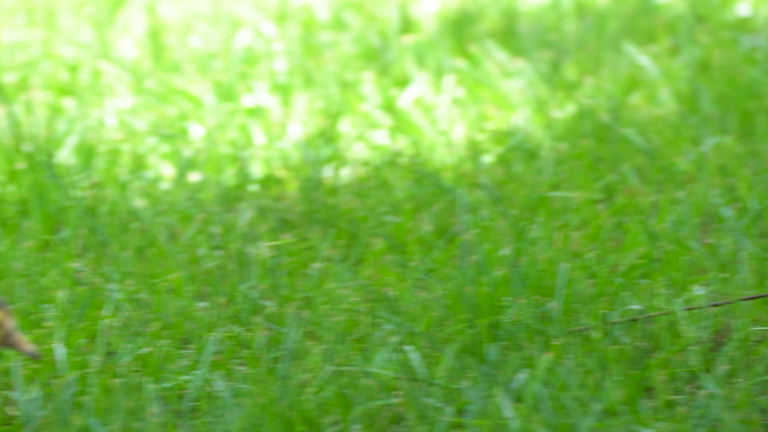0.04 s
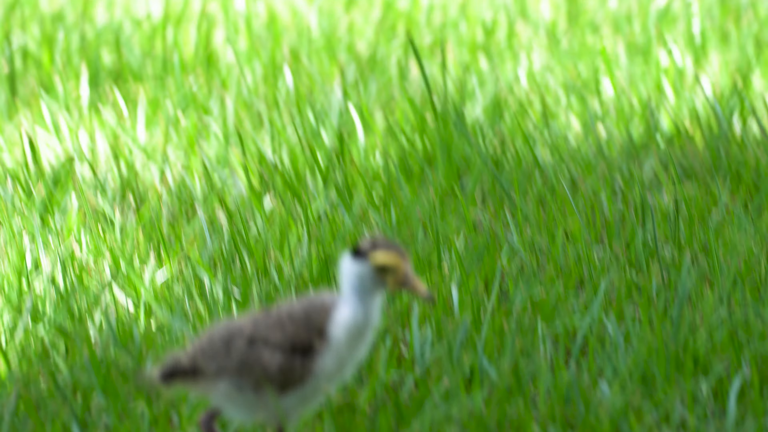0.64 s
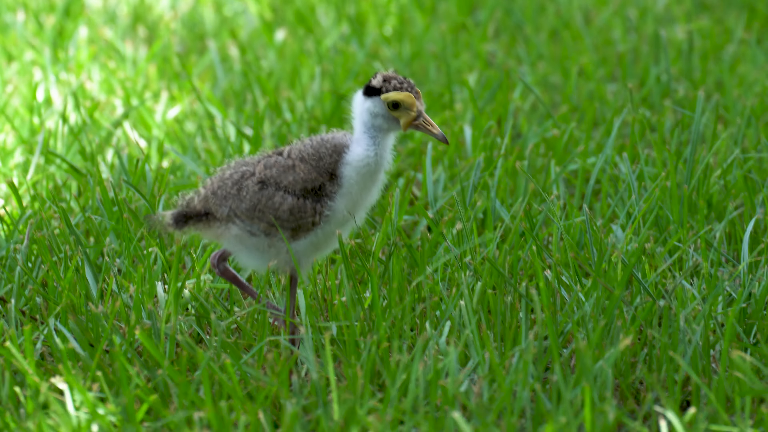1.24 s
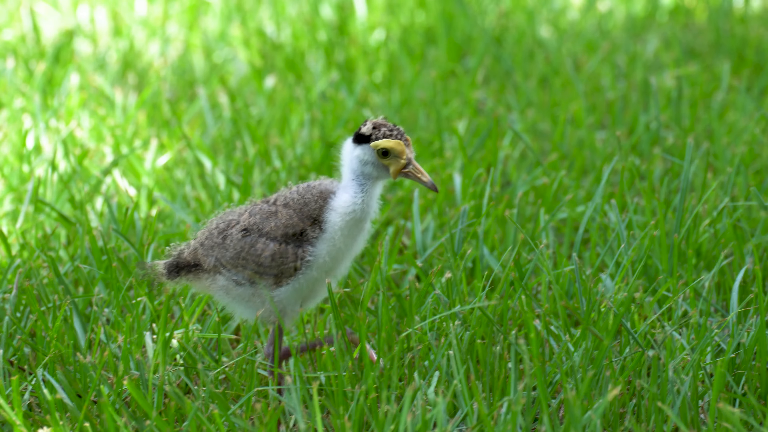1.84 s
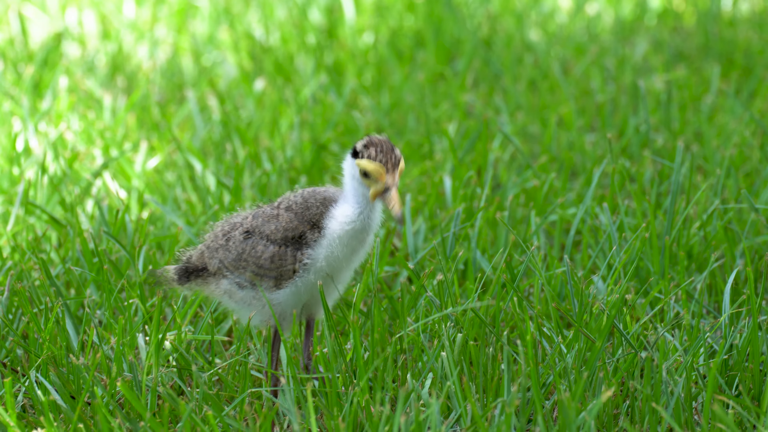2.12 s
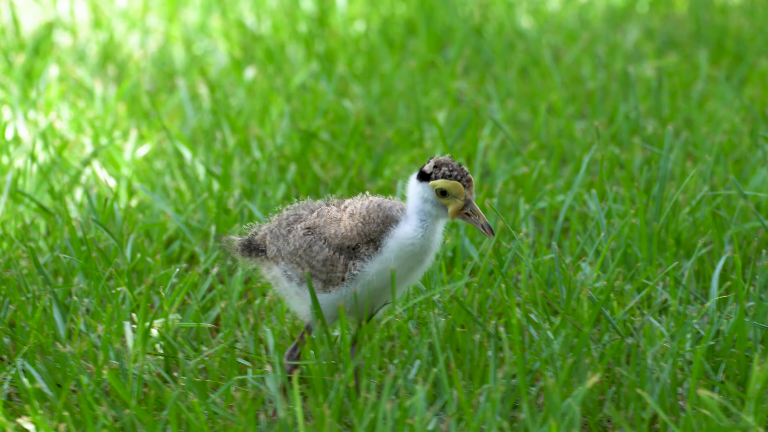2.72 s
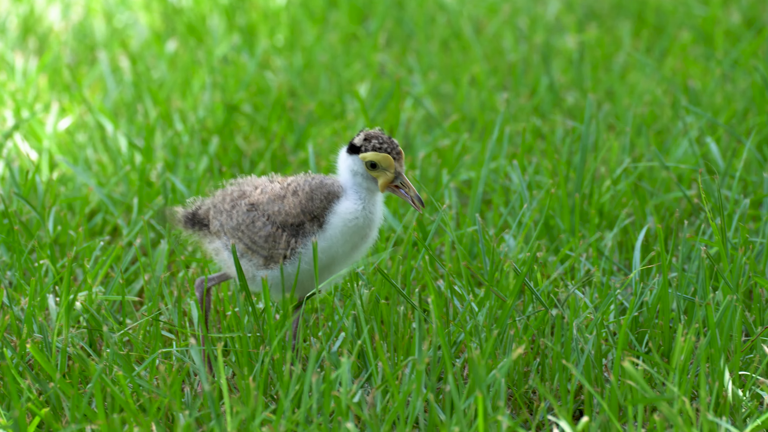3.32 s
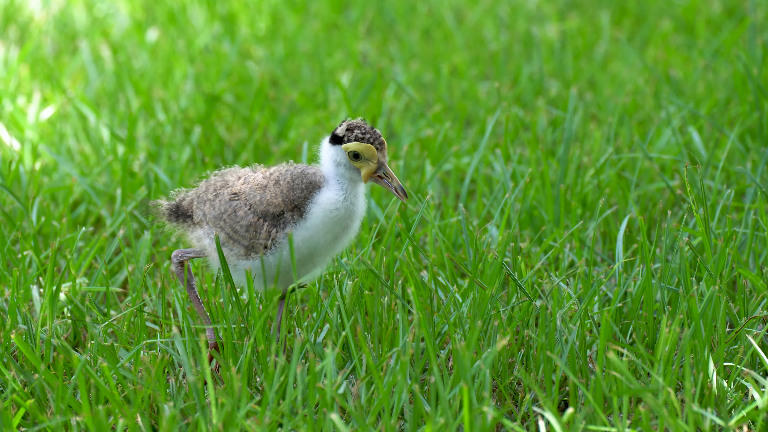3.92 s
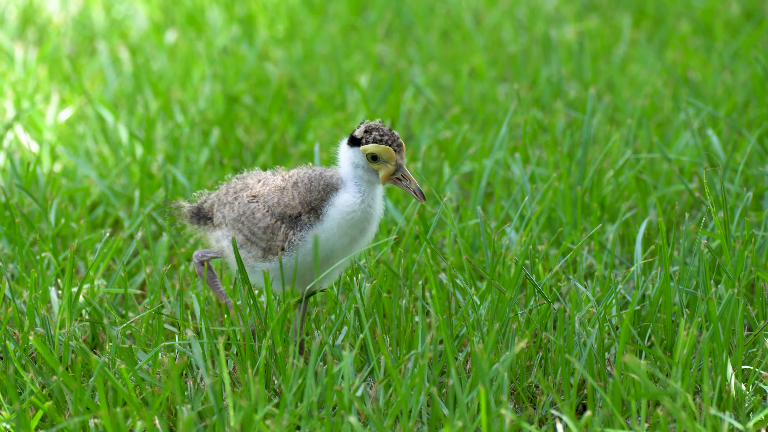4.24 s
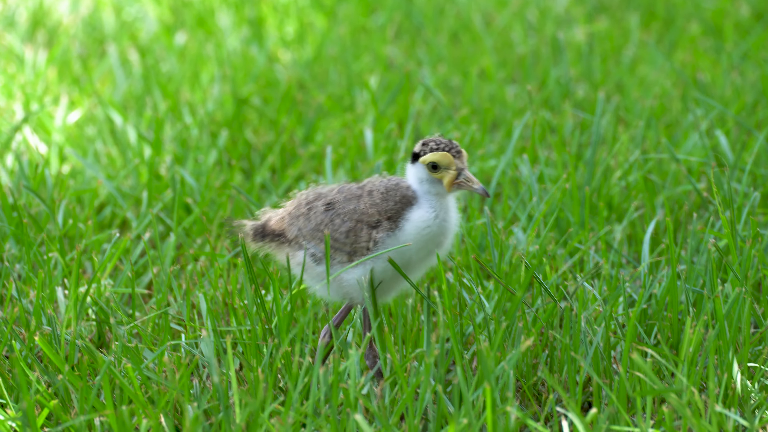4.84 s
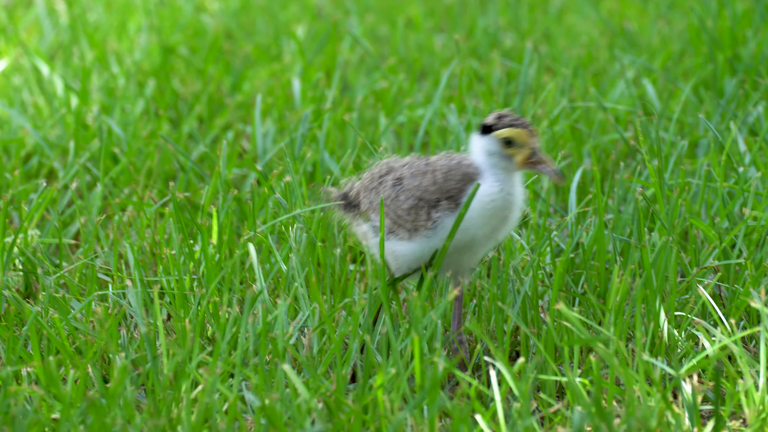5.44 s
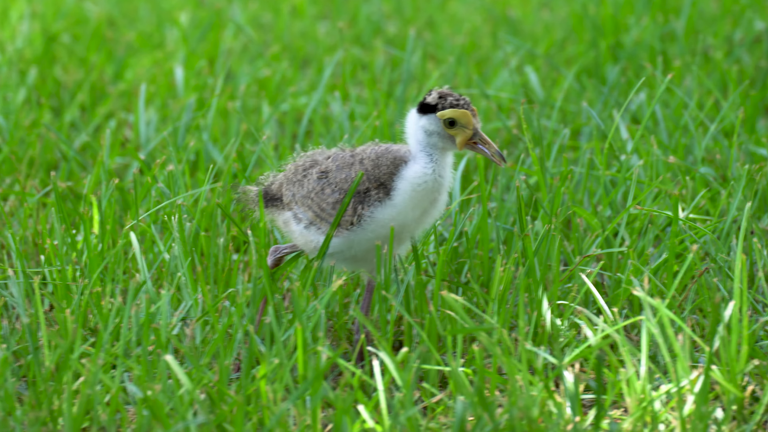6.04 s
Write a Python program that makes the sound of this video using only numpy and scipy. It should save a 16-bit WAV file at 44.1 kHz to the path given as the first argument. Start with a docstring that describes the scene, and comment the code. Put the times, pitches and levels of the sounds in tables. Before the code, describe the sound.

On a summer lawn, a soft, steady hiss of leaves lies under a shrill chorus of distant insects. Nearer insects rasp about three times a second, growing louder, while faint, short bird chirps come from the left. About halfway through, a young bird close to the microphone gives one brief, harsh screech. The insects keep pulsing and fade near the end. There is almost no bass.

```python
"""Shrill rasping calls on a summer lawn: a far chorus blurs into one wavering band, while nearer rasps swell
and fade about three times a second. Both set resonances ringing. Leaves and far surroundings hiss steadily, and
short whistled chirps come from further off. About three seconds in, a young bird forces air through its throat
in one harsh, toneless screech. There is almost no bass."""
import sys
import numpy as np
from scipy import signal
from scipy.fft import rfft, irfft, next_fast_len
from scipy.io import wavfile

SR = 44100
rng = np.random.default_rng(int(sys.argv[2]) if len(sys.argv) > 2 else 0)


def inscribe(sig):
    """Save sig as 16-bit PCM at rate SR to the path in sys.argv[1].

    A 1-D sig is mono; a 2-D sig holds one channel per row.
    Samples are clipped to [-1, 1] before scaling.
    """
    pcm = np.round(np.clip(np.atleast_2d(sig).T, -1, 1) * 32767)
    wavfile.write(sys.argv[1], SR, pcm.astype(np.int16))


N = 272097
TIME = np.arange(N) / SR
BINS_HZ = np.maximum(np.arange(N // 2 + 1) * SR / N, 1)


def from_db(db):
    """Turn decibels into a number to multiply by."""
    return 10 ** (np.asarray(db) / 20)


def rms_one(x):
    """Scale a signal so its average strength (rms) is 1."""
    return x / np.sqrt(np.mean(np.abs(x) ** 2) + 1e-20)


def over_hz(points):
    """Join a table's points into a curve over all frequencies."""
    hz, value = np.transpose(points)
    return np.interp(np.log(BINS_HZ), np.log(hz), value)


def drift(rate, size=N):
    """Wander at random, by about 1, up to about `rate` times a second."""
    padded = next_fast_len(size, real=True)
    hz = np.fft.rfftfreq(padded, 1 / SR)
    spectrum = rfft(rng.standard_normal(padded)) / (1 + (hz / rate) ** 2)
    return rms_one(irfft(spectrum, padded)[:size])


def pan(balance_db):
    """Left and right gains; a positive balance leans left."""
    return from_db(np.array([[.5], [-.5]]) * balance_db)


def left_and_right(mid, side, likeness):
    """Mix two noises for two ears: likeness 0 is unrelated, 1 or more is identical."""
    alike = np.clip(likeness, -1, 1)
    return np.sqrt(1 + alike) * mid + np.sqrt(1 - alike) * side * [[1], [-1]]


def stereo_noise(likeness, colour_db=0):
    """Noise with a chosen tone colour, partly shared by both ears."""
    mid, side = rfft(rng.standard_normal((2, N)))
    return rms_one(irfft(left_and_right(mid, side, likeness) * from_db(colour_db), N))


def resonate(drive, centre_hz, width_hz):
    """A resonance: only sound near a centre pitch, which may move, rings through."""
    turn = np.exp(2j * np.pi * np.cumsum(centre_hz) / SR)
    smoothing = signal.butter(2, width_hz / 2, fs=SR, output="sos")
    return rms_one((signal.sosfilt(smoothing, drive / turn) * turn).real)


def envelope_db(full_s, hold_s, rise_db_per_s, fall_db_per_s):
    """Rise to 0 dB at `full_s`, hold, then fade."""
    before_s = np.maximum(full_s - TIME, 0)
    after_s = np.maximum(TIME - full_s - hold_s, 0)
    return -rise_db_per_s * before_s - fall_db_per_s * after_s


# Tone colour of the hiss: (frequency [Hz], relative level [dB])
HISS_COLOUR = [(30, -61), (170, -52), (330, -41.5), (480, -30), (730, -8.5), (1100, 0.5), (2000, 4.5),
               (3000, 5.5), (4400, 10), (6000, 6), (8500, 1.5), (10000, 3), (12500, -7), (15500, -23)]
# How alike the hiss is in both ears: (frequency [Hz], likeness [1 or more = identical])
HISS_LIKENESS = [(300, 2), (700, 0.94), (1500, 0.54), (3000, .5), (6000, 0.16), (12000, 0.16)]
# Which way the hiss leans: (frequency [Hz], left minus right [dB])
HISS_BALANCE = [(500, -.5), (1500, 0.43), (5000, .7), (12000, -.8)]
def hiss(start_db=-33.5, rise_db_per_s=0.2831, flutter_db=0.68):
    """Leaves and far surroundings: a smooth, slowly growing hiss, wider in the treble."""
    level_db = start_db + rise_db_per_s * TIME + flutter_db * drift(20)
    colour_db = over_hz(HISS_COLOUR) + np.array([[.5], [-.5]]) * over_hz(HISS_BALANCE)
    return from_db(level_db) * stereo_noise(over_hz(HISS_LIKENESS), colour_db)


def rasp(size, depth_db, rate_hz, likeness):
    """A rasping drive: noise in quick, uneven bursts."""
    mid, side = rng.standard_normal((2, size))
    return left_and_right(mid, side, likeness) * from_db(depth_db * drift(rate_hz, size))


# Where the far chorus rings: (pitch [Hz], width [Hz], relative level [dB])
FAR_RESONANCES = [(3340, 490, -11), (4424, 990, 1.5), (6370, 1830, -1.5)]
def far_chorus(held_db=-34, flutter_db=1.5, waver=0.017):
    """Many distant callers blur into one shrill band that builds, holds and fades."""
    level_db = held_db + envelope_db(full_s=2.71, hold_s=2.1, rise_db_per_s=3.5, fall_db_per_s=9)
    rasping = rasp(N, depth_db=0.5, rate_hz=300, likeness=0.39)
    slide = 1 + waver * drift(5.5)
    rings = sum(from_db(db) * resonate(rasping, hz * slide, width_hz)
                for hz, width_hz, db in FAR_RESONANCES)
    return from_db(level_db + flutter_db * drift(6)) * rings


def whistle(centre_hz, wander_hz, flicker_db=2.0):
    """A thin tone that wanders in pitch, flickers, and shifts between the ears."""
    size = len(centre_hz)
    phase = 2 * np.pi * np.cumsum(centre_hz + wander_hz * drift(45, size)) / SR
    apart = drift(60, size) * np.array([[.5], [-.5]])
    return rms_one(np.sin(phase + apart) * from_db(flicker_db * drift(63, size)))


def ring(drive, centre_hz, width_hz, clear):
    """A noisy resonance with a share `clear` of its power in a whistle."""
    noisy = np.sqrt(1 - clear) * resonate(drive, centre_hz, width_hz)
    return noisy + np.sqrt(clear) * whistle(centre_hz, width_hz / 4)


# Each near rasp: (start [s], length [s], pitch [Hz], level [dB], left minus right [dB])
NEAR_SWELLS = [(0.231, 0.23, 4450, -37.5, 1), (0.547, 0.14, 4630, -37.5, 1.5), (0.781, 0.22, 4380, -37, 3),
               (1.0, 0.19, 4470, -35, 3), (1.27, .15, 4650, -33, 3), (1.458, 0.15, 4380, -33.5, 1.5),
               (1.79, .17, 4515, -32, 3), (2.062, .18, 4644, -29.5, 3), (2.325, 0.21, 4550, -29, 2.5),
               (2.57, 0.18, 4470, -29.5, 3), (2.78, .15, 4420, -28.5, 3), (3.029, .11, 4480, -26, 5.5),
               (3.442, 0.16, 4426, -25, 2), (3.62, .18, 4420, -26, 2), (3.815, .237, 4380, -27, 2.5),
               (4.109, .154, 4415, -28.5, 4), (4.33, .16, 4522, -25, 4), (4.644, .15, 4393, -25.5, 4),
               (4.79, 0.09, 4470, -31, 1), (4.928, .195, 4530, -28, 3), (5.179, 0.13, 4420, -31, 1.5),
               (5.38, 0.16, 4660, -27.5, .5)]
# Where a middling swell rings: (pitch [Hz], width [Hz], relative level [dB],
# boost as swells get louder [dB per dB], delay [s], clear share [0-1], pitch drop [Hz per s of scene])
NEAR_RESONANCES = [(3310, 351, -7.5, -0.3, 0.0024, 0.27, 44), (4492, 500, -0.5, 0, 0, 0.3, 0),
                   (6130, 1100, -1.44, 0.01, 0, 0.15, 0), (7360, 550, -10, 0.14, 0, 0, -2),
                   (9570, 1400, -10, 0.33, 0, 0.29, 0), (10650, 1400, -19, -0.1, 0, 0, 0)]
def near_rasps(middling_hz=4486, middling_db=-29, rise_s=0.024, fall_s=0.028,
                 arch=0.014, waver=0.00797, flutter_db=1.6):
    """Rasping swells ring the resonances; pitch lifts mid-swell, and louder ones are brighter."""
    out = np.zeros((2, N))
    for start, length, pitch_hz, level_db, balance_db in NEAR_SWELLS:
        span = (TIME > start - .1) & (TIME < start + length + .15)   # room to fade in and out
        t = TIME[span] - start
        rasping = rasp(len(t), depth_db=1.0, rate_hz=300, likeness=0.11)
        along = np.clip(t / length, 0, 1)
        bend = 1 - arch * np.cos(2 * np.pi * along) + waver * drift(40.7, len(t))
        slide = pitch_hz / middling_hz * bend
        for hz, width_hz, ring_db, boost, delay_s, clear, drop in NEAR_RESONANCES:
            rise = .5 + .5 * np.tanh((t - delay_s) / rise_s)
            fall = .5 + .5 * np.tanh((length - delay_s - t) / fall_s)
            boost_db = boost * (level_db - middling_db)
            gain = from_db(level_db + ring_db + boost_db + flutter_db * drift(6.7, len(t)))
            ringing = ring(rasping, (hz - drop * start) * slide, width_hz, clear)
            out[:, span] += gain * pan(balance_db) * rise * fall * ringing
    return out


# Each chirp: (start [s], length [s], first pitch [Hz], last pitch [Hz], level [dB], hoarseness [0-1])
FAR_CHIRPS = [(0.371, 0.026, 4920, 4640, -27.5, 0.1), (.785, 0.051, 4310, 4510, -34, 0.18),
              (1.015, 0.028, 5880, 5800, -34.5, .2), (1.343, .04, 4950, 4800, -34, .2),
              (1.714, .11, 3540, 3260, -37.5, 0.4), (2.06, .11, 3280, 3380, -39, 0.42),
              (2.506, 0.075, 4350, 4250, -32.5, 0.4), (3.053, 0.026, 4690, 4680, -23.5, .2),
              (3.074, 0.016, 6600, 6720, -27, .15), (3.816, 0.034, 3020, 3130, -35, 0.17),
              (3.912, 0.017, 6020, 5970, -28, 0.1), (3.92, 0.055, 2894, 2880, -38, .15),
              (4.189, 0.083, 4300, 4870, -31.5, .25), (4.301, 0.042, 4790, 4680, -29.5, 0.09),
              (4.614, 0.037, 4130, 4130, -30.5, .12), (4.682, .1, 4300, 4480, -26.5, .35),
              (4.74, .12, 3460, 3200, -35, .45), (4.979, 0.033, 4500, 4400, -24.5, .4),
              (5.753, 0.034, 3690, 3680, -33, .25), (5.754, 0.022, 3005, 2930, -32, .7),
              (5.95, .11, 4680, 5000, -41, 0.27)]
def far_chirps(hoarse_hz=600):
    """Short whistles off to the left that bend at the end; hoarse ones wobble in pitch."""
    out, wobble = np.zeros(N), drift(505)
    for start, length, start_hz, end_hz, level_db, hoarse in FAR_CHIRPS:
        along = np.clip((TIME - start) / length, 0, 1)
        hz = start_hz + (end_hz - start_hz) * along ** 2 + hoarse * hoarse_hz * wobble
        loudness = from_db(level_db) * np.sqrt(8 * along * (1 - along))
        out += loudness * np.sin(2 * np.pi * np.cumsum(hz) / SR)
    return with_echoes(out) * pan(balance_db=8.0)


# Echoes from around the lawn: (delay [s], relative level [dB])
LAWN_ECHOES = [(.018, -14), (0.04, -9), (.071, -22)]
def with_echoes(x, smear_s=0.01):
    """Trees and walls send back smeared echoes, different in each ear."""
    response = np.zeros((2, N))
    for delay, echo_db in LAWN_ECHOES:
        fade = np.exp(-np.abs(TIME - delay) / smear_s) * (TIME > delay)
        cloud = rng.standard_normal((2, N)) * fade
        response += from_db(echo_db) * rms_one(cloud) / np.sqrt(N)
    return x + signal.fftconvolve(x[None], response, axes=1)[:, :N]


# Tone colour of the screech's bright rush: (frequency [Hz], relative level [dB])
RUSH_COLOUR = [(2200, -32), (3300, -8), (4100, 0.5), (5000, -2), (6300, -1), (7400, -2), (8200, -3.5),
               (9500, -6.5), (11500, -15), (13500, -27), (15500, -41)]
# Tone colour of its lower growl: (frequency [Hz], relative level [dB])
GROWL_COLOUR = [(600, -60), (1000, -25.5), (1300, -5.5), (2000, -3), (2350, -3.5), (2900, 3.5), (3500, -6),
                (5000, -38)]
# Two pushes of air: (start [s], length [s], first resonance [Hz], last resonance [Hz], level [dB])
AIR_PUSHES = [(3.125, .064, 3100, 2050, -23), (3.238, 0.084, 3170, 1520, -26)]
def bird_screech(rush_db=-17, growl_db=-25, push_growl_db=-11.0, rough_db=0.5, rough_hz=800):
    """Air is forced through the throat; each push lifts the growl and slides the resonance down."""
    effort_db = envelope_db(full_s=3.139, hold_s=0.12, rise_db_per_s=200, fall_db_per_s=45.5)
    air = stereo_noise(likeness=0.56)
    throat, pushing = 0, 0
    for start, length, start_hz, end_hz, level_db in AIR_PUSHES:
        along = np.clip((TIME - start) / length, 0, 1)
        push = from_db(level_db) * 2 * np.sqrt(along * (1 - along))
        throat_hz = start_hz + (end_hz - start_hz) * along
        throat += push * resonate(air, throat_hz, width_hz=520)
        pushing += push
    rush = from_db(rush_db + effort_db) * stereo_noise(likeness=0.34, colour_db=over_hz(RUSH_COLOUR))
    growl_gain = from_db(growl_db + effort_db) + from_db(push_growl_db) * pushing
    growl = growl_gain * stereo_noise(likeness=0.56, colour_db=over_hz(GROWL_COLOUR))
    roughness = from_db(rough_db * drift(rough_hz))
    return (rush + growl + throat) * roughness * pan(balance_db=1.0)


def low_cut(x, edge_hz=1000):
    """Small animals give off no bass."""
    return signal.sosfilt(signal.butter(8, edge_hz, "high", fs=SR, output="sos"), x)


def scene():
    """The outdoor hiss with all the animals on top."""
    return hiss() + low_cut(far_chorus() + near_rasps() + bird_screech() + far_chirps())


def record(dry):
    """The highest treble, above 15600 Hz, is cut steeply."""
    return signal.sosfilt(signal.ellip(12, .1, 90, 15600, fs=SR, output="sos"), dry)


dry = scene()
out = record(dry)
inscribe(out)
```